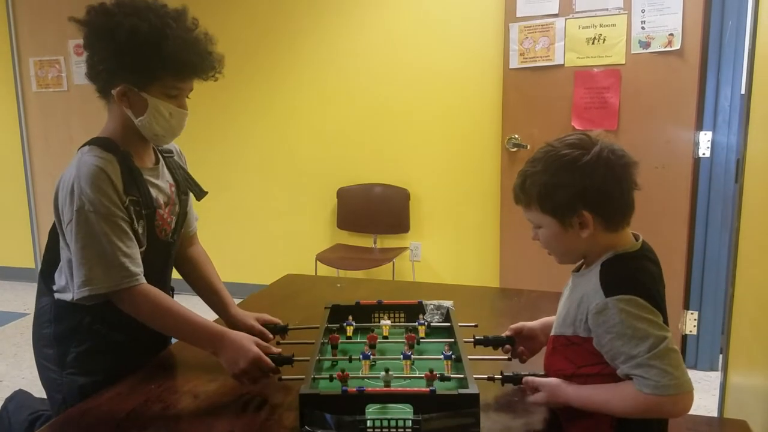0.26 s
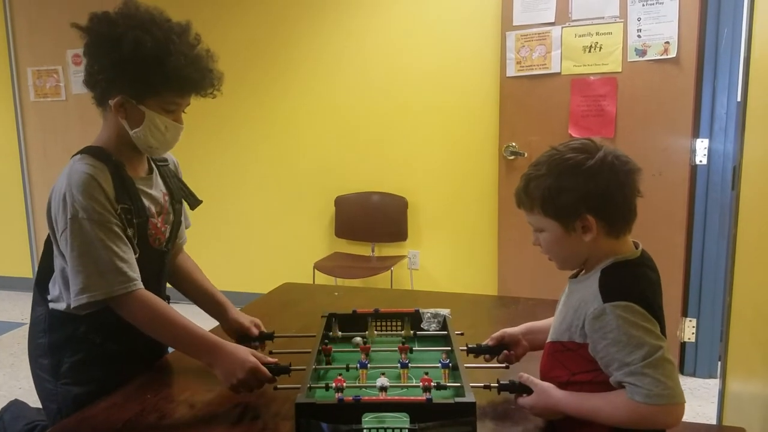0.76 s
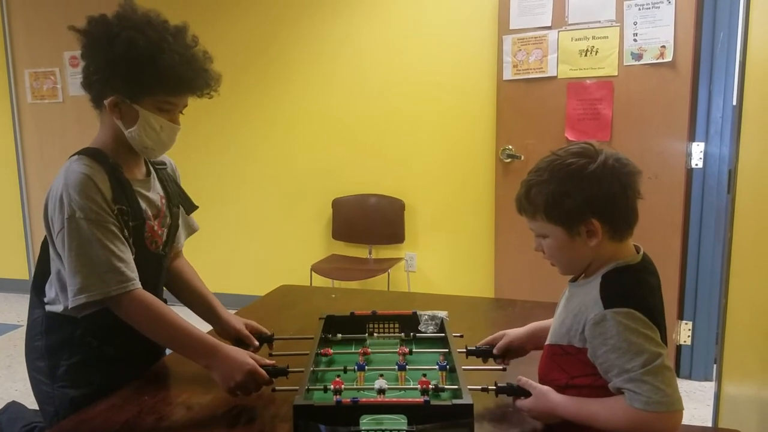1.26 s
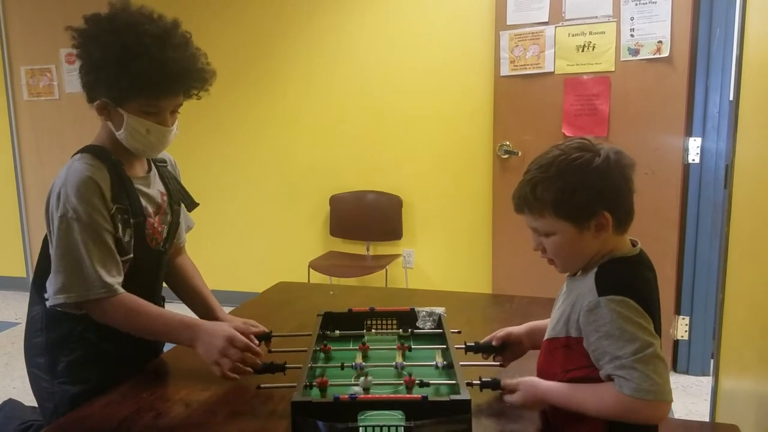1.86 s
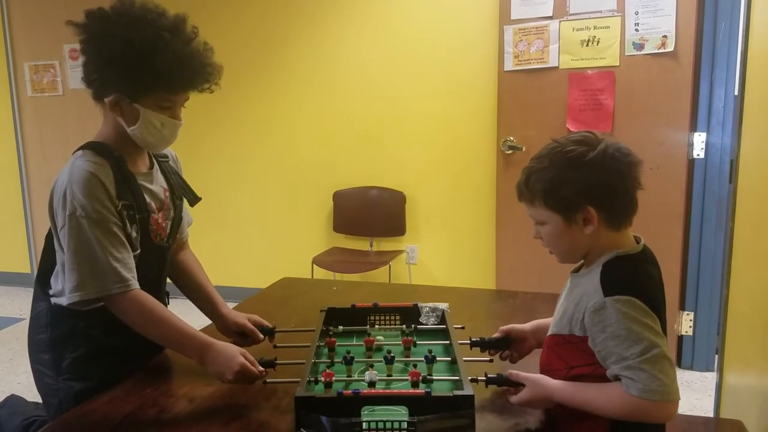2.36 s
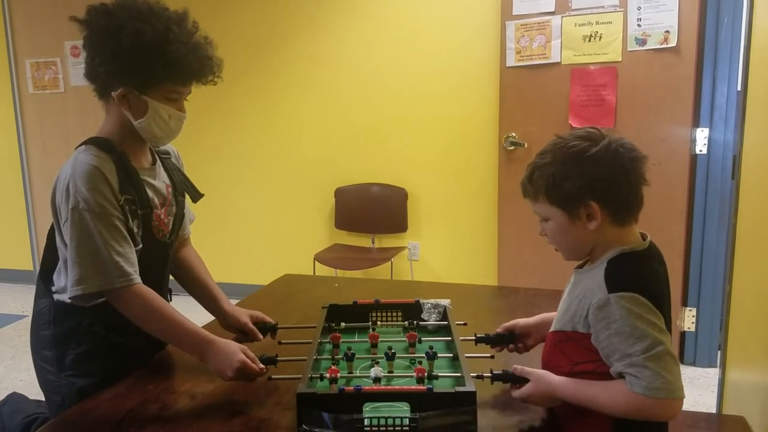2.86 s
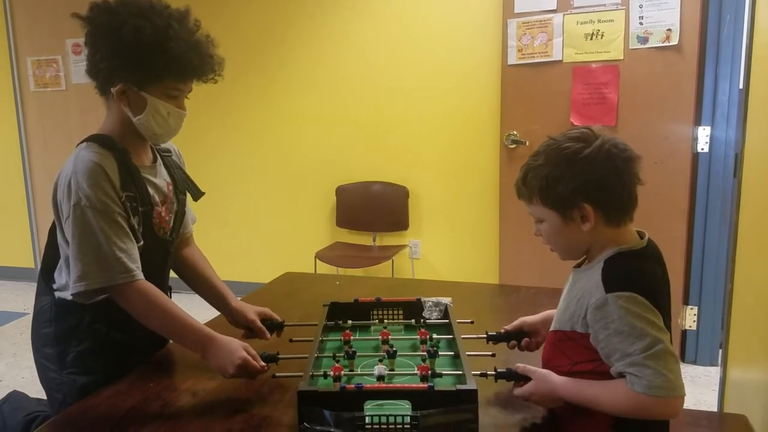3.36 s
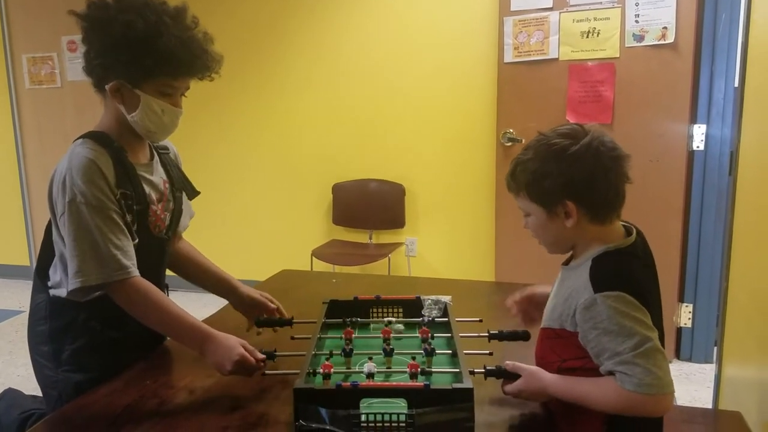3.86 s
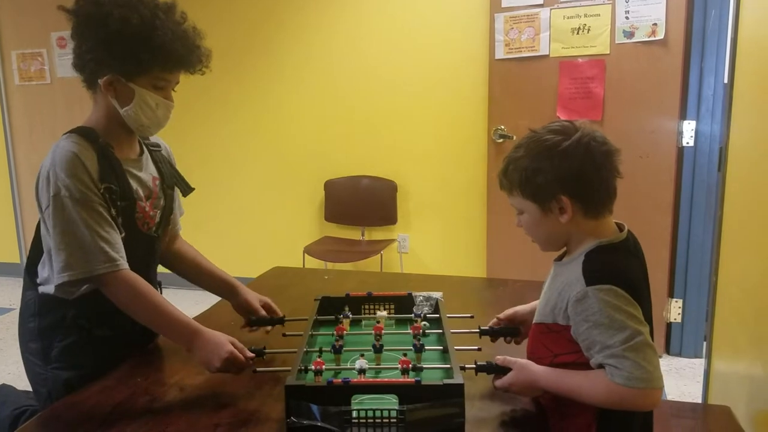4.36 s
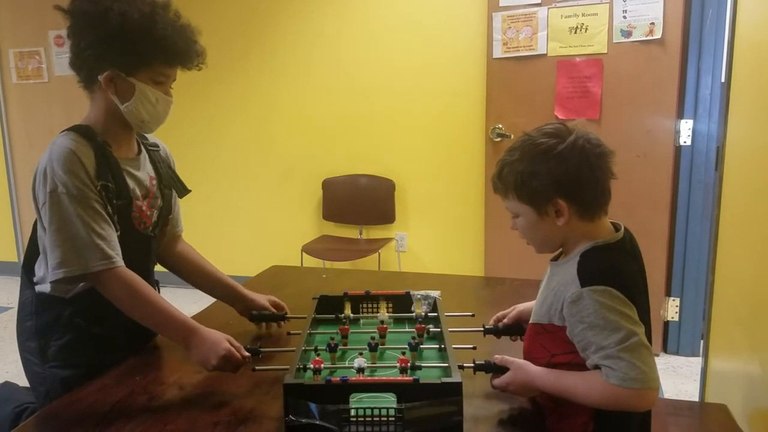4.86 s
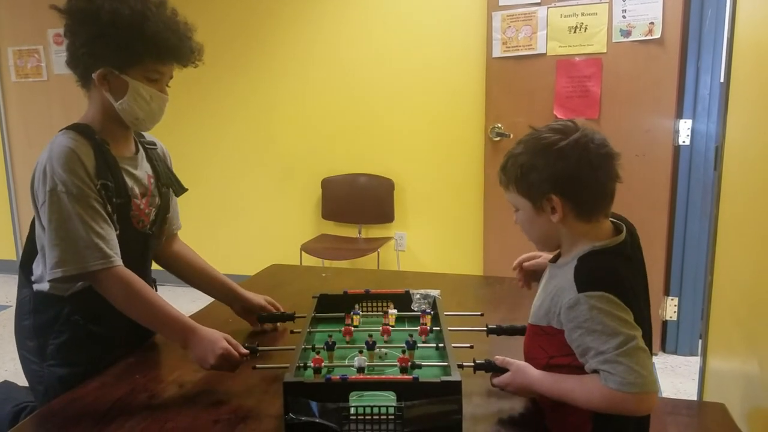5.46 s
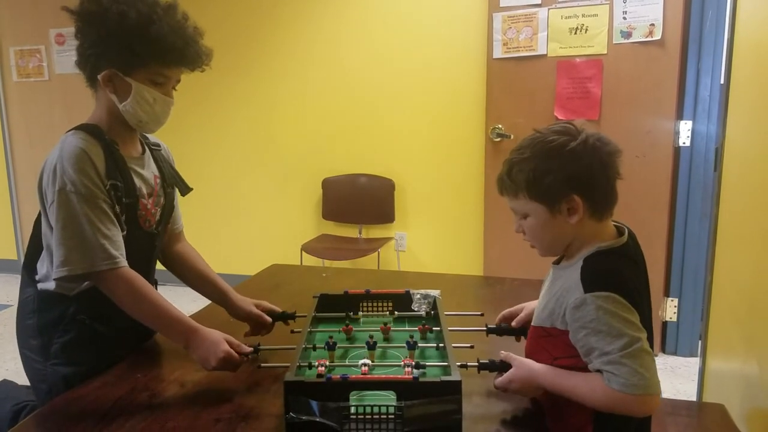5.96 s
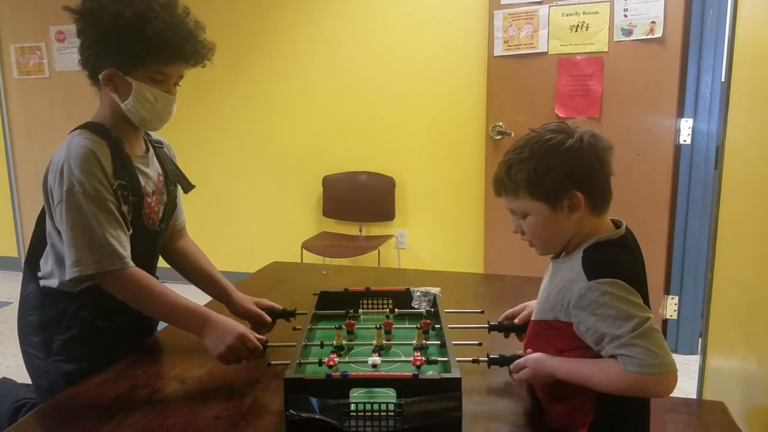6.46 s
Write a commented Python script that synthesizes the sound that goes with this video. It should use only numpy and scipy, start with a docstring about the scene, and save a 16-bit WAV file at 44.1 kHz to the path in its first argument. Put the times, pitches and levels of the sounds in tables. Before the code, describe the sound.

Irregular bursts of hard plastic clacks, rod rattles and hollow knocks from a tabletop football game, close up indoors with short echoes and quiet gaps.

```python
"""Table football in a hard-walled room

Two players at a small table-football game, heard by a pair of microphones a step away.
Men clack on the ball and rods knock plastic: noisy contacts strike banks of dying modes.
The box thuds on its wooden table; the ball rolls as filtered noise, with dull taps on the hollow field;
rods hiss in their bushes, and the room rings on in decaying echoes over hum and hiss."""
import sys
import numpy as np
from scipy import signal
from scipy.fft import rfft, irfft
from scipy.io import wavfile
from scipy.ndimage import uniform_filter1d

SR = 44100
rng = np.random.default_rng(int(sys.argv[2]) if len(sys.argv) > 2 else 0)


def wav_out(sig):
    """Save sig, one row per channel (or a flat mono array), as 16-bit PCM at SR to the path in sys.argv[1]."""
    wavfile.write(sys.argv[1], SR, np.round(np.clip(np.atleast_2d(sig).T, -1, 1) * 32767).astype(np.int16))


def volts(x):
    """Linear amplitude factor 10**(x/20) for a level x in dB, scalar or array-like."""
    e = np.asarray(x, float) / 20
    return 10 ** e


N = 295646  # length [samples]

# Event and mode levels are relative: the final mix balances direct sound and room.
# the ball on the field: (time [s], level [dB], lift of the field's third mode near its middle [dB])
ROLL = [(0.0, -41.5, 7.5), (0.47, -57.5, -14), (0.95, -41.5, -44), (1.31, -52.5, -20.5), (2.03, -46.5, -8),
        (2.45, -50.5, -37), (2.7, -53.5, -7.5), (2.9, -68.5, 12), (3.4, -57.5, 5.5), (3.73, -52, 3.5),
        (4.0, -67.5, 6), (4.25, -72, -2.5), (5.2, -68, 6.5), (5.6, -60.5, -13), (6.7, -79, -5)]
# rods pushed through their bushes: (start [s], length [s], hiss level [dB], box shudder level [dB])
STROKES = [(0.0, 0.043, -63.5, -50), (0.691, 0.13, -48.5, -46.5), (1.521, 0.28, -62.5, -51),
           (3.627, 0.05, -44.5, -67), (3.863, 0.31, -73, -66), (4.251, 0.32, -82.5, -71),
           (4.659, 0.25, -74, -56), (5.233, 0.081, -42, -53.5), (6.182, 0.13, -58, -48)]
# blows of men, ball and rods:
# (time [s], men level [dB], field over men [dB], rods and tick over men [dB], chatter [s])
CLACKS = [(0.0874, -13.5, 1, 0.5, 0.0032), (0.1135, -15.5, 0, -6, 0.0087), (0.616, -34, -1, 6.5, 0.016),
          (0.701, -25.5, 15.5, 16.5, 0.065), (0.7736, -12, 9, 12, 0.015), (0.845, -16, -3.5, -2.5, 0.0092),
          (0.9144, -9, 0, -11, 0.0066), (0.961, -40, 6, -20, 0.0034), (1.096, -11, -2.5, -18.5, 0.0046),
          (1.15, -21.5, -13, -27, 0.0042), (1.5467, -37.5, 8, 16, 0.024),
          (1.733, -25.5, -27.5, 17.5, 0.014), (1.8153, -11.5, -1, -4, 0.006),
          (1.8797, -5, -17, -36, 0.0073), (1.9596, -20, -31, 1.5, 0.0092), (2.6551, -27.5, -6, -34, 0.0013),
          (2.8408, -28, -2.5, -6, 0.0056), (3.4233, -34, -5, 21.5, 0.0068),
          (3.467, -14.5, -1.5, -37, 0.0062), (3.514, -20, -33.5, 12, 0.0065),
          (3.5302, -8, -9.5, -46, 0.0054), (3.605, -21, 0, 9, 0.0059), (3.618, -12.5, 6, 11, 0.011),
          (3.627, -11, -23, 8.5, 0.0055), (3.639, -3.5, -2, -3.5, 0.013), (3.691, -13.5, 1, -17.5, 0.0061),
          (3.75, -14.5, -2.5, 4.5, 0.0062), (4.2678, -37.5, -1, 7, 0.013), (4.548, -37, -2, -1, 0.011),
          (4.6552, -40, -21, 1, 0.0028), (4.709, -25, 0.5, 8.5, 0.016), (4.7726, -31.5, -4.5, 9, 0.007),
          (4.853, -39.5, 2, 10, 0.0057), (4.9441, -31, -5, 6, 0.017), (5.144, -48.5, -11, 16.5, 0.0058),
          (5.1861, -35.5, -6.5, 26, 0.0037), (5.2376, -23.5, -4, 21, 0.0041), (5.2763, -8.5, 4, 8, 0.02),
          (5.323, -3.5, -2.5, 2, 0.016), (5.4334, -2, -7.5, -5, 0.011), (5.534, -39, -11, 19, 0.0077),
          (6.0249, -11.5, 1.5, -2.5, 0.035), (6.168, -35.5, 14.5, 14, 0.025), (6.228, -27, 14, 10, 0.048),
          (6.489, -55.5, 6, 13, 0.0029)]
# dull taps on the field, hops of the ball and a few soft knocks: (time [s], level [dB])
DULL_TAPS = [(0.404, -28.5), (0.437, -29), (0.473, -29), (0.516, -24), (0.573, -20), (0.607, -22.5),
             (1.058, -11.5), (2.11, -19.5), (2.183, -26), (2.242, -21), (2.364, -24), (2.384, -20.5),
             (2.522, -23), (2.595, -27.5), (3.239, -33.5), (3.95, -26), (4.146, -37.5), (5.667, -33.5),
             (5.699, -31.5), (5.748, -38.5), (5.889, -38), (5.922, -31)]
# the box jolted on the table: (time [s], box level [dB], table top over box [dB])
THUDS = [(0.702, -17.5, -13), (0.78, -11.5, -12), (1.098, -22, -30), (1.481, -33.5, -1.5),
         (1.555, -22, -5.5), (1.786, -16, -18), (1.818, -13.5, -19), (3.471, -19.5, -11.5), (3.619, -5, -9),
         (3.643, -3.5, -20), (3.692, -13.5, -6.5), (3.759, -12, -50), (4.274, -28.5, -3.5), (4.54, -36, -2),
         (4.654, -34, 5), (4.685, -29, -16), (5.239, -18, -9), (5.274, -3, -14), (5.3, -5, -8.5),
         (5.918, -40, 0), (6.011, -6.5, -11), (6.173, -29.5, -12.5), (6.222, -22.5, -5),
         (6.283, -20.5, -12.5)]
# a rod let go keeps ringing on one note: (time [s], frequency [Hz], level [dB], t60 [s])
PINGS = [(3.753, 4560, -25.5, 0.045), (5.238, 8400, -4, 0.008), (5.238, 15620, -19.5, 0.08)]

# modes of the table top, box, hollow field, plastic men and steel rods:
# (nominal frequency [Hz], relative level [dB], t60 [s], taken as 0.002 when shorter)
TABLE_TOP_MODES = [(91.6, -8, 0.74), (121.7, 5.5, 0.4), (153.5, 14.5, 0.087)]
BOX_MODES = [(182, -12.5, 0.16), (243, -4.5, 0.088), (313.2, -0.5, 0.065), (363, -0.5, 0.083),
             (435, 1, 0.04), (510, -2, 0.048)]
FIELD_MODES = [(394, -4, 0.58), (520, 7.5, 0.064), (639.6, 12, 0.061), (820, 7, 0.017), (906.4, -3.5, 0.15),
               (963, 9, 0.022), (1219.4, 10.5, 0.018), (1469, 8.5, 0.016)]
MEN_MODES = [(1633, 7, 0.0063), (1940, 0, 0.027), (2240, -6.5, 0.035), (2490, 16, 0.0035),
             (3077, 2, 0.0083), (3820, 1, 0.0013), (4760, -3, 0.0064)]
ROD_MODES = [(5260, 11.5, 0.004), (5980, 13, 0.0035), (6570, 2.5, 0.022), (8040, 8.5, 0.0014),
             (8740, -4.5, 0.0035), (9360, 7, 0.0033), (10650, 13, 0.0015), (12700, 3.5, 0.005),
             (14000, -8.5, 0.0049), (14000, 9.5, 0.0041)]

# spectrum of rod friction: (frequency [Hz], relative density [dB])
RUB_SPECTRUM = [(800, -40), (2000, 10.5), (4700, 0), (5200, 5), (5800, 0), (9000, -11.5), (15000, -8),
                (17000, -35.5)]
# spectrum of room hum and microphone hiss: (frequency [Hz], relative density [dB])
AIR_SPECTRUM = [(15, -78), (25, -3), (43, -21.5), (65, -7), (118, -17.5), (266, -14.5), (450, -23.5),
                (809, -64.5), (8370, -50), (14800, -40.5), (16500, -67)]
# diffuse sound: (frequency [Hz], left-right likeness [0-1])
DIFFUSE_LIKENESS = [(50, 1), (250, 0.94), (700, 0.64), (1200, 0.082), (16000, 0.045)]
# decay of the room: (frequency [Hz], t60 [s])
WALL_DECAY = [(100, 0.26), (400, 0.63), (1500, 0.37), (4000, 0.51), (8000, 0.29), (15000, 0.19)]
# microphone colour: (frequency [Hz], left over right [dB])
MIC_COLOUR = [(60, 0.5), (130, -3), (290, -2.5), (640, 0), (1410, -2.5), (3100, -4), (6820, -8), (15000, 3)]
# direct sound round the body that carries the microphones: (frequency [Hz], left lead [rad])
LEFT_LEAD = [(200, 0), (900, -.3), (1500, 1.2), (2400, 7)]

MEN_LIKENESS, FIELD_LIKENESS, ROD_LIKENESS = 0.88, 0.9, 0.1  # left-right likeness of their contacts
FIRST_TOUCH = 5.0  # greatest strength of the first touch, over the rms at the start of the chatter
CLEAN_HIT_S = 0.005  # contacts that chatter longer than this begin more softly
MODE_SPREAD_DB = 4  # how much the mode levels vary from blow to blow
ROD_DETUNE = 0.045  # rod modes are tuned a little differently at random in each blow
ROD_TICK = 0.9  # broad tick of steel on plastic, over the ring of the rods
BOX_PUSH_S, TOP_PUSH_S = 0.019, 0.0083  # decay of a jolt's push on box and table top
TAP_S, TAP_TICK_DB = 0.012, -21  # contact of a dull tap, and a faint tick with the ring of the plastic men
SEAM_PER_S, SEAM_JITTER_S, SEAM_SPREAD_DB = 26.0, 0.004, 1.8  # the seam meets the field twice a turn
GRAIN = 0.25  # steady grain of the field, over a seam tap of middling strength
BALL_EDGE_HZ = 2040  # the rolling ball is too soft a contact to excite more than this
STROKE_RISE_S, STROKE_FADE_S, IDLE_HISS_DB = 0.0037, 0.006, -83.5
RATTLE_DB, RATTLE_S, RATTLE_PER_S = -31, 0.04, 1400  # loose men and rods shiver after each blow
PING_TO_ROOM_DB = -13  # a thin rod note hardly stirs the room
ECHO_BUILD_UP_S = 0.0022
BASS_EDGE_HZ = 74  # the small box radiates little below this
DIRECT_DB, ROOM_DB, AIR_DB = 9.5, 5.5, -56.5
MIC_EDGE_HZ, MIC_CEILING = 15800, 0.95


def evened(x):
    """Scales to rms 1."""
    return x / np.sqrt(np.mean(x ** 2) + 1e-20)


def read(points, hz):
    """Reads a spectrum on a log-frequency axis."""
    f, value = np.transpose(points)
    return np.interp(np.log(hz + 1), np.log(f + 1), value)


def ring(modes, detune=1, size=20000):
    """Impulse response of a set of dying modes, peak 1."""
    t = np.arange(size) / SR
    hz, db, t60 = np.transpose(modes)[:, :, None]
    decay = volts(db - 60 * t / np.maximum(t60, 0.002))
    tones = np.sin(2 * np.pi * hz * np.reshape(detune, (-1, 1)) * t)
    x = (decay * tones).sum(0)
    return x / abs(x).max()


def struck(modes, chance, length, snap=0.22, same=0.98, detune=0.025, size=4000):
    """A first touch and a chattering contact drive modes whose weight and tuning vary with each blow.

    Returns left, right and the sound toward the walls."""
    count = len(modes)
    moved = np.array(modes)
    moved[:, 1] += MODE_SPREAD_DB * chance[:count]
    body = ring(moved, 1 + detune * chance[50:50 + count], size=size)
    body[0] += snap  # the contact itself, heard as a broad tick

    t = np.arange(2000) / SR
    left, other = chance[100:4100].reshape(2, -1)
    right = same * left + np.sqrt(1 - same ** 2) * other
    contact = np.exp(-t / np.clip(length, 0.0003, 0.02)) * np.array([left, right])
    contact[:, 0] = FIRST_TOUCH * min(1, CLEAN_HIT_S / length)
    # all directions together: the chatter's chance colour evens out
    toward_walls = np.linalg.norm(contact[0]) * (t == 0)
    x = signal.fftconvolve(np.vstack([contact, toward_walls]), body[None], axes=1)

    x /= np.linalg.norm(x, axis=1, keepdims=True)  # equal energy in all three
    x /= abs(x[2]).max()
    return x / np.sqrt(1 + length * 400)  # blows with longer chatter are made quieter overall


def add(mix, s, sound):
    """Places a three-way sound at its time: left, right, and toward the walls."""
    part = mix[:, round(s * SR):][:, :sound.shape[1]]
    part += sound[:, :part.shape[1]]


def pair(spectrum_db, size):
    """Two-channel noise of rms 1, alike in the bass and unlike in the treble."""
    hz = np.fft.rfftfreq(size, 1 / SR)
    a, b, c, d = rng.standard_normal((N * 4 // size + 5, len(hz), 4)).T
    same = read(DIFFUSE_LIKENESS, hz)[:, None]
    left, other = a + 1j * b, c + 1j * d
    right = same * left + np.sqrt(1 - same ** 2) * other
    bands = np.array([left, right]) * volts(read(spectrum_db, hz))[:, None]
    noise = signal.istft(bands, nperseg=size, noverlap=size * 3 // 4)[1]
    return evened(noise[:, :N])


def roll():
    """The ball's seam and the field's grain tap the hollow field: a fine rumble with lumps."""
    s, db, lift_db = np.transpose(ROLL)
    t = np.arange(N) / SR
    jitter, size = rng.standard_normal((400, 2)).T
    at = np.round((np.arange(400) / SEAM_PER_S + SEAM_JITTER_S * jitter) * SR).astype(int)
    inside = (at >= 0) & (at < N)
    taps = np.zeros(N)
    taps[at[inside]] = volts(SEAM_SPREAD_DB * size[inside])
    lumps = signal.oaconvolve(taps, np.exp(-np.arange(2000) / 116.0))[:N]
    grain = (GRAIN + lumps) * rng.standard_normal(N)
    grain = signal.sosfilt(signal.butter(3, BALL_EDGE_HZ, fs=SR, output="sos"), grain)
    whole = evened(signal.oaconvolve(grain, ring(FIELD_MODES))[:N])
    middle = evened(signal.oaconvolve(grain, ring(FIELD_MODES[2:3]))[:N])
    lift = volts(-5.5) * (volts(np.interp(t, s, lift_db)) - 1)  # below 0 dB it thins the third mode
    return volts(np.interp(t, s, db)) * (whole + lift * middle)


def slide():
    """Steel rubs plastic: a grainy hiss and a low box shudder rise, hold and fade with each stroke."""
    t = np.arange(N) / SR
    shapes = []
    for s, length, *_ in STROKES:
        rise = np.clip((t - s) / STROKE_RISE_S, 0, 1)
        fade = np.exp(-np.maximum(t - s - length, 0) / STROKE_FADE_S)
        shapes.append(rise * fade)
    hiss_level, shudder_level = volts(np.transpose(STROKES)[2:]) @ np.array(shapes)
    grain = volts(6.6 * evened(uniform_filter1d(rng.standard_normal(N), 150)))
    hiss = pair(RUB_SPECTRUM, size=256)
    shudder = evened(signal.oaconvolve(rng.standard_normal(N), ring(BOX_MODES, size=6000))[:N])
    strokes = hiss_level * evened(grain * hiss)
    return strokes + volts(IDLE_HISS_DB) * hiss + shudder_level * shudder


def clacks():
    """Each blow rings the plastic men, the upper modes of the field and the steel rods."""
    out = np.zeros((3, N))
    chances = rng.standard_normal((len(CLACKS), 3, 4100))
    for (s, db, field_db, rod_db, chatter), c in zip(CLACKS, chances):
        men = struck(MEN_MODES, c[0], chatter, snap=0.65, same=MEN_LIKENESS)
        field = struck(FIELD_MODES[3:], c[1], chatter, snap=0.011, same=FIELD_LIKENESS)
        rods = struck(ROD_MODES, c[2], chatter, snap=ROD_TICK, same=ROD_LIKENESS, detune=ROD_DETUNE)
        add(out, s, volts(db) * (men + volts(field_db) * field + volts(rod_db) * rods))
    return out


def rattle():
    """Loose men and rods give small random ticks that swell with each blow and die after it."""
    s, db = np.transpose(CLACKS)[:2]
    kicks = np.zeros(N)
    kicks[np.round(s * SR).astype(int)] = volts(db)
    shake = signal.lfilter([1], [1, -np.exp(-1 / (RATTLE_S * SR))], kicks)
    chosen = rng.random((2, N)) < RATTLE_PER_S / 2 / SR  # half the ticks each for men and rods
    ticks = shake * chosen * rng.standard_normal((2, N))
    men = signal.oaconvolve(ticks[0], ring(MEN_MODES, size=1500))[:N]
    rods = signal.oaconvolve(ticks[1], ring(ROD_MODES, size=1500))[:N]
    return volts(RATTLE_DB) * (men + rods)


def dull_taps():
    """Hops of the ball and a few soft knocks ring the field dully, with a faint tick of the plastic men."""
    out = np.zeros((3, N))
    for (s, db), c in zip(DULL_TAPS, rng.standard_normal((len(DULL_TAPS), 2, 4100))):
        tap = struck(FIELD_MODES, c[0], TAP_S, snap=0.1, same=FIELD_LIKENESS)
        tick = struck(MEN_MODES, c[1], 0.0055, same=MEN_LIKENESS)
        add(out, s, volts(db) * (tap + volts(TAP_TICK_DB) * tick))
    return out


def thuds():
    """The box and the table top under it boom when jolted."""
    out = np.zeros((3, N))
    for (s, db, top_db), c in zip(THUDS, rng.standard_normal((len(THUDS), 2, 4100))):
        box = struck(BOX_MODES, c[0], BOX_PUSH_S, snap=0, size=12000)
        table_top = struck(TABLE_TOP_MODES, c[1], TOP_PUSH_S, snap=0, size=12000)
        add(out, s, volts(db) * (box + volts(top_db) * table_top))
    return out


def pings():
    """Single rod notes, roughened by a chattering start."""
    out = np.zeros((3, N))
    for (s, hz, db, t60), c in zip(PINGS, rng.standard_normal((len(PINGS), 4100))):
        note = struck([(hz, 0, t60)], c, 0.01, snap=0, same=MEN_LIKENESS, detune=0.0029, size=8000)
        add(out, s, volts(db) * note)
    out[2] *= volts(PING_TO_ROOM_DB)
    return out


def room(x):
    """Sparse echoes that build up and die band by band; the bass reaches both microphones alike."""
    taps = np.zeros((2, SR))
    at = np.arange(150, SR - 20, 20) + rng.integers(0, 20, (2, (SR - 151) // 20))
    np.put_along_axis(taps, at, rng.choice([-1.0, 1.0], at.shape), 1)
    hz, t, bands = signal.stft(taps, SR, nperseg=512)
    same = read(DIFFUSE_LIKENESS, hz)[:, None]
    bands[1] = same * bands[0] + np.sqrt(1 - same ** 2) * bands[1]
    decay = volts(-60 * t / read(WALL_DECAY, hz)[:, None])
    tail = signal.istft(bands * decay, SR, nperseg=512)[1]
    tail *= np.clip((np.arange(tail.shape[1]) / SR - 0.003) / ECHO_BUILD_UP_S, 0, 1)
    return signal.fftconvolve(x[None], tail / np.linalg.norm(tail[0]), axes=1)[:, :N]


def rooms(x):
    """The feed turns steadily through three echo patterns, so the room's tail keeps varying."""
    turn = np.pi * 3.1 * np.arange(N) / SR
    # the three squared feeds always sum to one
    feeds = [np.sqrt(2 / 3) * np.cos(turn + k * np.pi / 3) for k in range(3)]
    return sum(room(x * feed) for feed in feeds)


def scene():
    """The game, its different arrival at the two microphones, the room and the quiet air."""
    game = roll() + slide()[[0, 1, 0]] + clacks() + rattle() + dull_taps() + thuds() + pings()
    game = signal.sosfilt(signal.butter(4, BASS_EDGE_HZ, "high", fs=SR, output="sos"), game)
    left, right, toward_walls = game
    lag = np.exp(-1j * read(LEFT_LEAD, np.fft.rfftfreq(N, 1 / SR)))
    direct = np.array([left, irfft(rfft(right) * lag, N)])
    air = pair(AIR_SPECTRUM, size=2048)
    return volts(DIRECT_DB) * direct + volts(ROOM_DB) * rooms(toward_walls) + volts(AIR_DB) * air


def roll_off(x):
    """The treble ends steeply here."""
    return signal.sosfilt(signal.butter(12, 17140, fs=SR, output="sos"), x)


def record(dry):
    """Each microphone has its own colour; both round off the loudest peaks and share a top edge."""
    hz = np.fft.rfftfreq(N, 1 / SR)
    colour = volts(np.outer([0.5, -0.5], read(MIC_COLOUR, hz)))
    mix = irfft(rfft(dry) * colour, N)
    mix /= (1 + (mix / MIC_CEILING) ** 6) ** (1 / 6)
    mix = signal.sosfilt(signal.cheby1(12, 0.5, MIC_EDGE_HZ, fs=SR, output="sos"), mix)
    return roll_off(mix)


dry = scene()
out = record(dry)
wav_out(out)
```